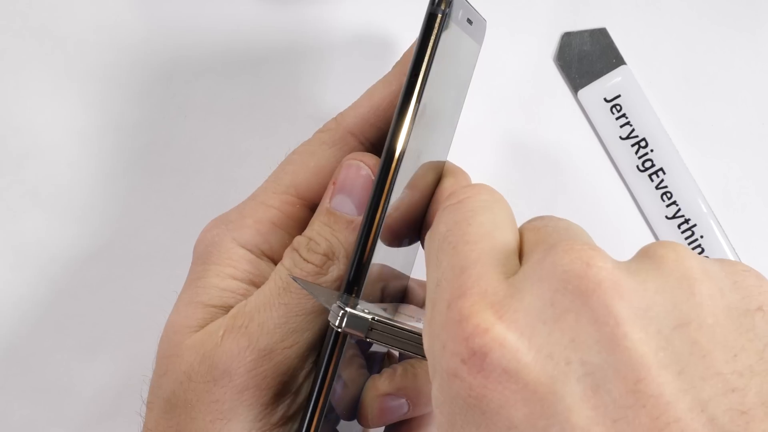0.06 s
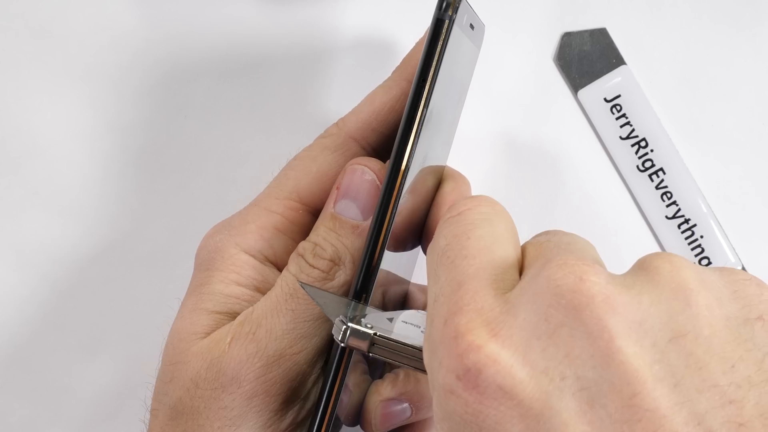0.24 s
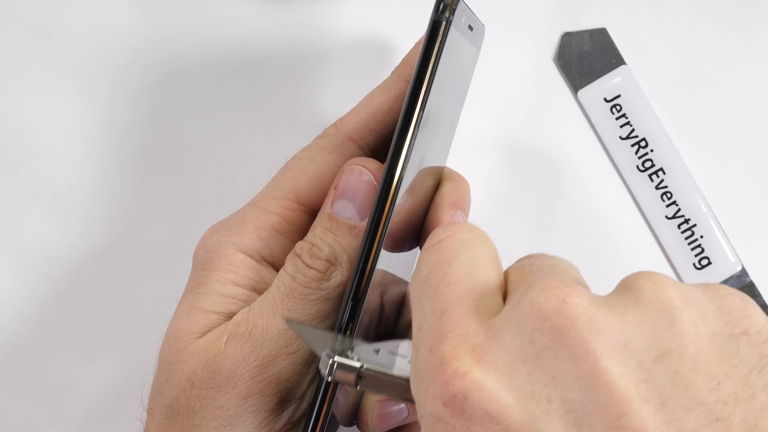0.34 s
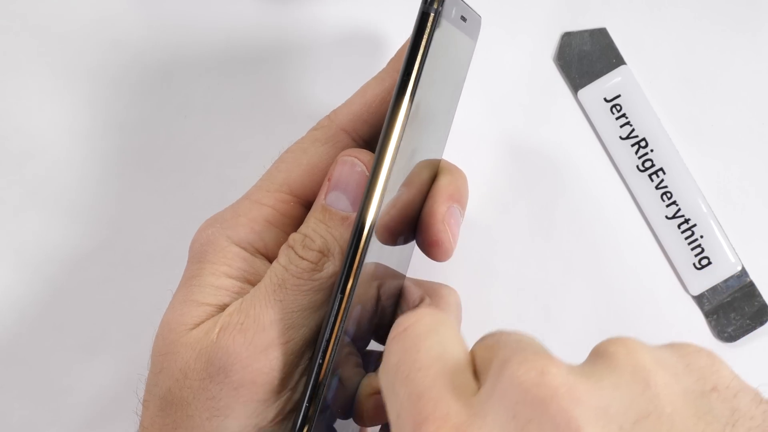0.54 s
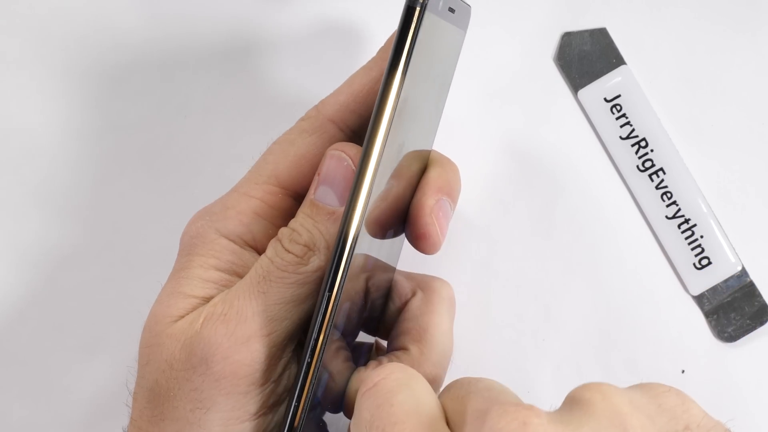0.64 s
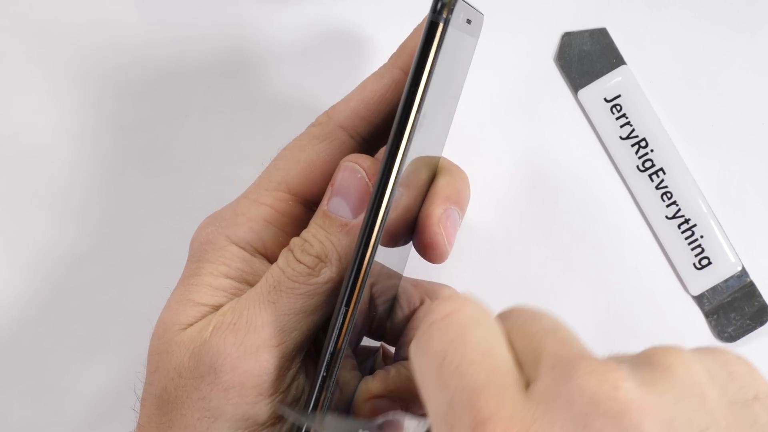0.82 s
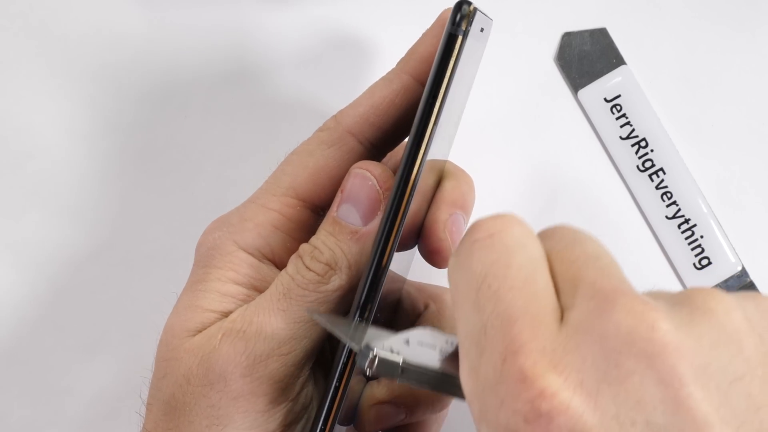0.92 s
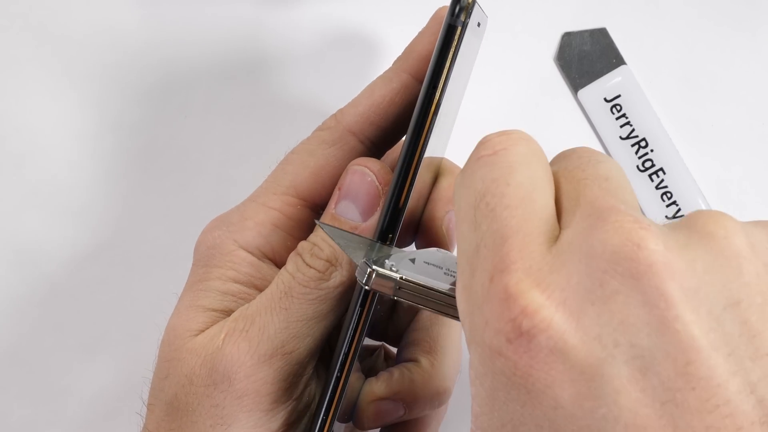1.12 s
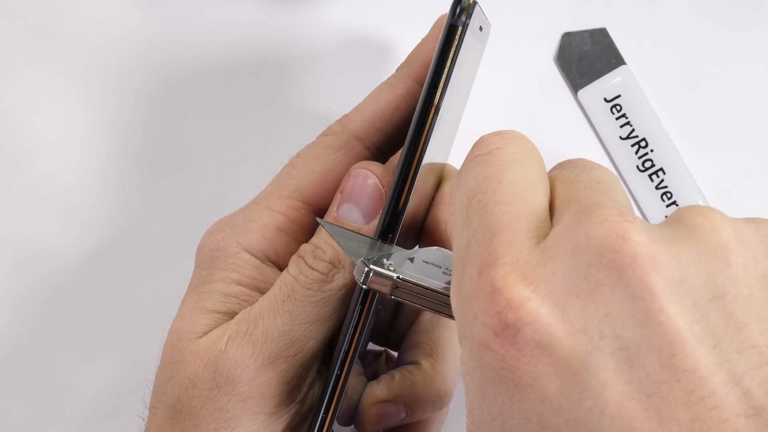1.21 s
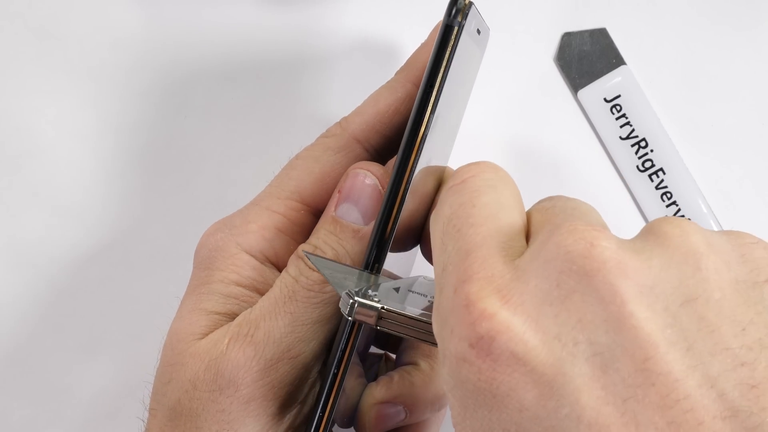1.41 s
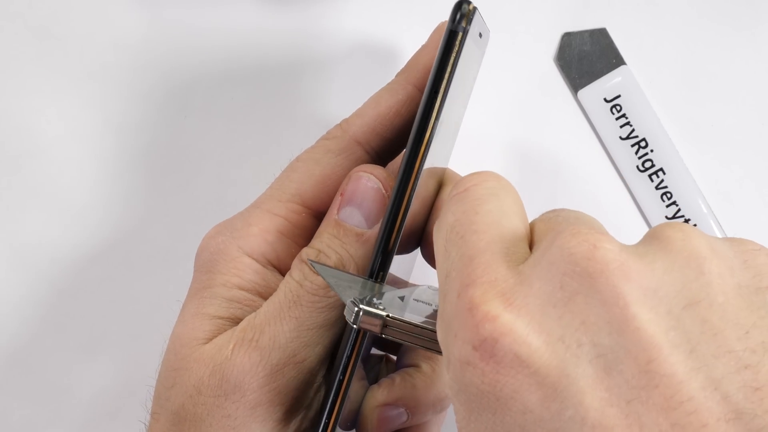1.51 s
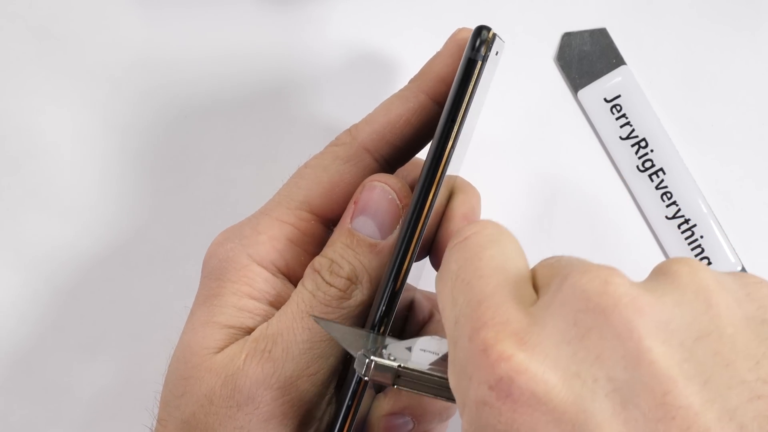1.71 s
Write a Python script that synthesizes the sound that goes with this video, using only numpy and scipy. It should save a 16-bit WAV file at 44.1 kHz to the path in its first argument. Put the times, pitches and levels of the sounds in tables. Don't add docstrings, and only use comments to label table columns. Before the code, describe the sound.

A razor blade taps a phone's metal frame, scrapes in stuttering gritty bursts that harden into a brief squeal, then taps again and scrapes more lightly; close microphone in a quiet room.

```python
import sys
import numpy as np
from scipy import signal
from scipy.fft import rfft, irfft
from scipy.io import wavfile
from scipy.ndimage import uniform_filter1d

SR = 44100
rng = np.random.default_rng(int(sys.argv[2]) if len(sys.argv) > 2 else 0)


def generate_wav(signal):
    frames = np.transpose(np.atleast_2d(signal))
    scaled = np.clip(frames, -1, 1) * 32767
    pcm = np.round(scaled).astype(np.int16)
    wavfile.write(sys.argv[1], SR, pcm)


def level_to_linear(level):
    exponent = np.asarray(level, float) / 20
    return 10 ** exponent


N = 77175

# f/Hz, density/dB
AIR_SPECTRUM = [(12, -28), (20, 0.5), (81, -3), (624, -27), (780, -31), (1530, -30), (1710, -32),
                (3340, -31.5), (16000, -43.5)]
# f/Hz, level/dB
HUM_TONES = [(60, -57.5), (120, -62.5)]
GLIDE_STARTS_S = 0, .202, 1.0665, .672, .09
GLIDE_LENGTHS_S = .03, .115, .104, .065, .105
# level/dB, fall over the length/dB
GLIDE_LEVELS = [(-47, -22), (-38.5, -22.5), (-32.5, -7.5), (-27, -11.5), (-60.5, 4)]
# f/Hz, density/dB
GLIDE_SPECTRA = [
    [(240, -32), (400, -20.5), (1010, -37), (1930, -6.5), (3530, -19.5), (16000, -24)],
    [(1470, -43.5), (2500, -15.5), (3250, 3.5), (4500, -10.5), (6300, -5), (7500, -10), (9000, 2.5),
     (12400, -27.5), (16000, -34)],
    [(800, -26.5), (1900, -1), (2720, -19), (3150, 2.5), (3750, 1), (4200, -18), (5050, -8.5),
     (5950, -21.5), (16000, -28)],
    [(500, -43), (900, -4), (1250, -19.5), (1570, -3.5), (1750, -18.5), (2100, -0.5), (2570, -11),
     (3110, -2), (9090, -19), (16000, -32)],
    [(1500, -17.5), (3300, -4), (6000, -17.5), (16000, -17)],
]
# t/s, peak level/dB, f/Hz, t60/s
TICKS = [(.165, -46, 6110, .017), (.19, -45.5, 9160, 0.035), (.2413, -27.5, 10200, 0.0072),
         (0.5318, -8, 9800, 0.0029), (.5364, -8.5, 9000, .008), (.594, -23, 9000, 0.0066),
         (0.548, -14.5, 3200, 0.024), (0.612, -21.5, 3100, .012), (.819, -46.5, 7620, .01),
         (.80, -51.5, 9500, 0.018), (.832, -49, 9580, .01), (.844, -47.5, 9000, .008),
         (0.872, -43, 2914, .02), (0.881, -41.5, 2800, 0.033), (0.913, -38, 8000, 0.0063),
         (.9125, -46, 4500, 0.0088), (0.921, -50.5, 9000, 0.0098), (.945, -52, 6900, .01),
         (.984, -53, 2960, 0.022), (1.007, -35.5, 9000, .008), (1.0063, -46.5, 3020, .012),
         (1.032, -54, 3000, 0.032), (1.257, -54, 9320, 0.007), (1.273, -49.5, 8500, 0.011),
         (1.361, -52, 8500, .004), (1.3694, -14, 7400, 0.012), (1.373, -24.5, 6060, 0.045),
         (1.562, -35, 9000, 0.005), (1.6165, -42, 8680, 0.014), (1.6153, -44, 2500, 0.011),
         (1.648, -46.5, 3120, 0.029), (1.722, -51.5, 3240, .02)]
# f/Hz, level/dB, t60/s
TAP_1_MODES = [(305, -20.5, 0.02), (750, -23, 0.0045), (1410, -17.5, 0.0041), (2120, -10, 0.0089),
               (2644, -25, 0.023), (3310, -21, 0.039), (3970, -31.5, .01), (4560, -21.5, 0.004),
               (5110, -24, 0.0066), (6230, -9.5, 0.0045), (7376, -9, 0.011), (8950, 8.5, 0.006),
               (10660, -6.5, 0.0068)]
# f/Hz, level/dB, t60/s
TAP_2_MODES = [(1262, -20, 0.025), (1990, -7.5, 0.0085), (3295, -13, 0.028), (4380, -16, .02),
               (8500, -23.5, 0.019), (9920, -17, 0.0086), (13200, -21, .008)]
# t/s, length/s, level/dB, peak place/0-1
LIGHT_SLIPS = [
    (.339, 0.023, -22, 0.23),
    (.366, 0.016, -21, 0.6),
    (.3925, 0.021, -20.5, 0.2),
    (.409, 0.0049, -21, 0.1),
    (.4185, 0.037, -20.5, 0.6),
    (.446, 0.02, -20.5, 0.85),
    (.509, 0.018, -23, 0.1),
]
# t/s, length/s, level/dB, peak place/0-1
HARD_SLIPS = [
    (.485, .016, -10, 0.49),
    (.539, 0.018, -9, 0.33),
    (.566, 0.023, -9, 0.4),
    (.6055, .015, -4.5, 0.13),
    (.6205, 0.0092, -8, 0.59),
    (.631, 0.012, -12, 0.48),
    (.642, 0.014, -16.5, 0.46),
    (.654, .026, -15.5, .5),
    (.678, 0.03, -25.5, .1),
]
# t/s, length/s, level/dB, peak place/0-1
SECOND_SLIPS = [
    (1.369, 0.018, -29.5, .3),
    (1.395, 0.0085, -40.5, .4),
    (1.4135, 0.015, -31.5, .6),
    (1.435, .008, -37.5, .8),
    (1.442, 0.032, -22.5, .3),
    (1.468, .027, -24.5, .5),
    (1.5045, 0.013, -25, .25),
    (1.533, 0.012, -33.5, .4),
    (1.545, .02, -49, .3),
]
# f/Hz, density/dB
LIGHT_GRIT = [(90, -53.5), (150, -2), (1400, -10.5), (4320, -8.5), (7620, -9.5), (10500, -7), (12400, -15),
              (14000, -17), (16000, 3.5)]
HARD_GRIT = [(88, -55.5), (150, -8), (1390, -44), (1940, -24), (4760, -14), (6910, -16.5), (7770, -2.5),
             (12400, 4.5), (16000, -23.5)]
SECOND_GRIT = [(88, -26), (150, -9.5), (1450, -10.5), (2020, -7), (5360, -20.5), (7620, -2), (11900, -19),
               (14200, -5), (16000, -4.5)]
# f/Hz, width/Hz, level/dB
LIGHT_RING = [(1890, 150, -10.5), (8000, 680, -8), (8940, 720, -5.5), (14200, 900, -9)]
HARD_RING = [(1980, 250, -10.5), (3176, 170, -11), (4600, 56, -11.5), (6370, 500, -13.5), (9730, 87, -13),
             (12760, 350, -7.5)]
SECOND_RING = [(1609, 30, -16.5), (1960, 160, -17), (7640, 300, -8), (8500, 400, -19), (13970, 690, -7.5)]
# t/s, peak level/dB
LIGHT_SNAPS = [(0.3456, -6), (0.3477, 9), (0.3501, 3), (0.3548, -17.5), (0.3673, -13.5), (0.369, -14),
               (0.3727, -7), (0.3778, -1.5), (0.3933, -16.5), (0.397, -9.5), (0.4016, -4.5),
               (0.4068, -18.5), (0.4111, -14.5), (0.4198, -16.5), (0.4232, -4.5), (0.4258, -5),
               (0.43, -4.5), (0.4388, -5), (0.4433, -13), (0.4468, -13), (0.4556, -17.5), (0.4589, -9.5),
               (0.4605, -6.5), (0.4631, -11)]
SECOND_SNAPS = [(1.3799, -16.5), (1.3983, -22), (1.4147, -21.5), (1.4192, -14), (1.4239, -15.5),
                (1.4405, -23.5), (1.4442, -11), (1.4481, -11), (1.4533, -14.5), (1.458, -17.5), (1.46, -13),
                (1.4656, -14), (1.4705, -12.5), (1.4721, -15), (1.4784, -11.5), (1.481, -20),
                (1.4863, -19.5), (1.4924, -10.5), (1.5054, -17.5), (1.5071, -18), (1.5088, -19),
                (1.5108, -15), (1.5346, -22.5), (1.5393, -24)]
# t/s, low mode f/Hz, high mode f/Hz, high minus low/dB, level/dB
SQUEAL_TRACK = [
    (0.484, 5820, 6954, 7.5, -1.5),
    (0.546, 5772, 6860, 6, -5),
    (.56, 5408, 6900, -4, -3.5),
    (.585, 5446, 6810, -1, -7.5),
    (0.611, 5700, 7000, 6, -4.5),
    (0.629, 5424, 6370, -7.5, -2.5),
    (0.649, 5408, 6390, -11.5, 3),
    (.664, 4870, 6160, -2, -3),
    (.678, 4530, 5990, -1, -4),
]
# t/s, f/Hz, level/dB
FRAME_TRACK = [
    (0.553, 1850, -26.5),
    (0.58, 1933, -30.5),
    (.597, 1960, -35.5),
    (0.622, 1993, -21),
    (0.644, 2033, -25.5),
    (.67, 2135, -41.5),
    (0.697, 2132, -32),
    (0.732, 2030, -37.5),
    (.745, 1960, -61),
]
# t/s, peak level/dB, f/Hz, length/s
THUDS = [(0.345, -32, 67, 0.054), (0.479, -26.5, 73, 0.026), (0.492, -35.5, 220, 0.049),
         (0.537, -27, 84, 0.029), (.543, -29, 305, 0.031), (.605, -35, 73.3, 0.031),
         (.606, -31, 259.2, 0.012), (1.374, -33.5, 64.8, 0.19), (1.443, -33.5, 69.1, 0.041),
         (1.488, -36, 68.3, 0.13), (1.502, -39.5, 217.2, 0.062)]
# f/Hz, t60/s
ROOM_T60 = [(500, .45), (2000, .33), (5000, .28), (9000, .17), (15000, .07)]

CHIP_FROM_HZ = 4500


def evened(x):
    return x / np.sqrt(np.mean(x ** 2) + 1e-20)


def read(points, hz):
    f, value = np.transpose(points)
    return np.interp(np.log(hz + 1), np.log(f + 1), value)


def add(mix, s, sound):
    part = mix[round(s * SR):][:len(sound)]
    part += sound[:len(part)]


def colour(x, spectrum):
    level_db = read(spectrum, abs(np.fft.fftfreq(4096, 1 / SR)))
    log_gain = np.log(level_to_linear(np.maximum(level_db, -100)))
    taps = np.fft.ifft(np.exp(np.conj(signal.hilbert(log_gain)))).real[:2048]
    return signal.oaconvolve(x, taps / np.linalg.norm(taps))[:len(x)]


def resonate(x, hz, width_hz):
    turn = np.exp(2j * np.pi * np.cumsum(hz * np.ones(len(x))) / SR)
    r = np.exp(-np.pi * width_hz / SR)
    ringing = turn * signal.lfilter([1], [1, -r], x / turn + 1e-18)
    return np.sqrt(2 * (1 - r * r)) * ringing.real


def air():
    level_db = -51
    t = np.arange(N) / SR
    hum = sum(level_to_linear(db) * np.sqrt(2) * np.sin(2 * np.pi * hz * t) for hz, db in HUM_TONES)
    spectrum = rfft(rng.standard_normal(N)) * level_to_linear(read(AIR_SPECTRUM, np.fft.rfftfreq(N, 1 / SR)))
    return level_to_linear(level_db) * evened(irfft(spectrum, N)) + hum


def glides():
    release_s = 0.0067
    out = np.zeros(N)
    t = np.arange(12000) / SR
    rows = zip(GLIDE_STARTS_S, GLIDE_LENGTHS_S, GLIDE_LEVELS, GLIDE_SPECTRA)
    for start, length, (db, fall_db), spectrum in rows:
        lift_db = 10 * np.maximum(t - length, 0) / release_s
        shape = level_to_linear(db + fall_db * t / length - lift_db)
        add(out, start, shape * colour(rng.standard_normal(len(t)), spectrum))
    return out


def ticks():
    relative_width, ring, fizz = .16, .7, .13
    out = np.zeros(N)
    t = np.arange(2000) / SR
    for s, db, hz, t60 in TICKS:
        noise = rng.standard_normal(len(t))
        burst = ring * resonate(noise, hz, hz * relative_width) + fizz * np.diff(noise, prepend=0)
        add(out, s, level_to_linear(db - 60 * t / t60) * burst)
    return out


TAP_1_S, TAP_2_S = .1995, 1.0638


def taps():
    rise_s, crack_t60_s, longest_t60_s = .0007, .02, .022
    crack_band = signal.butter(2, (930, 9000), "band", fs=SR, output="sos")
    out = np.zeros(N)
    t = np.arange(SR // 3) / SR
    for s, modes, crack_db in (TAP_1_S, TAP_1_MODES, -11), (TAP_2_S, TAP_2_MODES, -17):
        crack = signal.sosfilt(crack_band, rng.standard_normal(len(t)))
        sound = level_to_linear(crack_db - 60 * t / crack_t60_s) * crack
        for hz, db, t60 in modes:
            sound += level_to_linear(db - 60 * t / min(t60, longest_t60_s)) * np.sin(2 * np.pi * hz * t)
        add(out, s, np.minimum(t / rise_s, 1) * sound)
    return out


def beat():
    level_db, t60_s, rise_s = -26, .22, .003
    t = np.maximum(np.arange(N) / SR - TAP_1_S, 0)
    pair = sum(np.sin(2 * np.pi * hz * t) for hz in (1776.5, 1786.5))
    return np.minimum(t / rise_s, 1) * level_to_linear(level_db - 60 * t / t60_s) * pair


def pressure(slips):
    edge_s, edge_db = .0007, -9
    out = np.zeros(N)
    for start, length, db, peak in slips:
        u = np.arange(0, 1, 1 / (length * SR))
        peak = np.clip(peak, .02, .98)
        edge = np.minimum(np.minimum(u, 1 - u) * length / edge_s, 1)
        swell = np.minimum(u / peak, (1 - u) / (1 - peak))
        add(out, start, edge * level_to_linear(db + edge_db * (1 - swell)))
    return out


def chips():
    chips_per_s, spread_db, clump_db, clump_s, click_share = 9000, 3, 3.5, .0007, .3
    clumps = evened(uniform_filter1d(rng.standard_normal(N), round(clump_s * SR)))
    size_db = spread_db * np.minimum(rng.exponential(1, N), 3.5) + clump_db * np.minimum(clumps, 1.8)
    struck = rng.random(N) < chips_per_s / SR
    clicks = evened(level_to_linear(size_db) * rng.choice([-1., 1.], N) * struck)
    rub = evened(click_share * clicks + rng.standard_normal(N))
    low_pass = signal.butter(1, CHIP_FROM_HZ, fs=SR, output="sos")
    return clicks + signal.sosfilt(low_pass, rub - clicks), rub


def snaps(rows, db):
    out = np.zeros(N)
    s, peak_db = np.transpose(rows)
    out[np.round(s * SR).astype(int)] = level_to_linear(peak_db + db) * rng.choice([-1., 1.], len(s))
    return signal.sosfilt(signal.butter(1, CHIP_FROM_HZ, "high", fs=SR, output="sos"), out)


def stroke(drive, grit, ring):
    ringing = sum(level_to_linear(db) * resonate(drive, hz, width) for hz, width, db in ring)
    return colour(drive, grit) + ringing


def thuds(push):
    rumble_hz, rumble_db, smooth_s = 87.5, -35, 0.034
    low = signal.sosfilt(signal.butter(2, rumble_hz, fs=SR, output="sos"), rng.standard_normal(N))
    shake = np.sqrt(abs(uniform_filter1d(push, round(smooth_s * SR))))
    out = level_to_linear(rumble_db) * evened(low) * shake
    for s, db, hz, length in THUDS:
        t = np.arange(0, length, 1 / SR)
        shape = np.sin(np.pi * (t / length) ** 0.19)
        add(out, s, level_to_linear(db) * shape * np.sin(2 * np.pi * hz * t))
    return out


def squeal(push, rub):
    level_db, width_hz, wobble = -0.5, 320, .03
    lock = 0.52
    s, *curves = np.transpose(SQUEAL_TRACK)
    low_hz, high_hz, tilt_db, db = (np.interp(np.arange(N) / SR, s, c) for c in curves)
    waver = 1 + wobble * evened(uniform_filter1d(rng.standard_normal(N), 150))

    def sing(hz):
        in_step = np.cos(2 * np.pi * np.cumsum(hz) / SR)
        return resonate(push * (rub + lock * in_step), hz, width_hz)

    low = level_to_linear(-tilt_db / 2) * sing(low_hz * waver)
    high = level_to_linear(tilt_db / 2) * sing(high_hz * waver[::-1])
    return level_to_linear(db + level_db) * (low + high)


def frame(rub):
    level_db, width_hz, lock = -17, 210, 0.087
    s, hz, db = np.transpose(FRAME_TRACK)
    t = np.arange(N) / SR
    hz = np.interp(t, s, hz)
    in_step = np.cos(2 * np.pi * np.cumsum(hz) / SR)
    drive = level_to_linear(np.interp(t, s, db, -120, -120) + level_db) * (rub + lock * in_step)
    return resonate(resonate(drive, hz, width_hz), hz, width_hz)


def room(x):
    tail = np.zeros(SR)
    at = np.arange(200, SR - 20, 20)
    tail[at + rng.integers(0, 20, at.shape)] = rng.choice([-1., 1.], at.shape)
    hz, t, z = signal.stft(tail, SR, nperseg=256)
    decay = level_to_linear(-60 * t / read(ROOM_T60, hz)[:, None])
    tail = signal.istft(z * decay, SR, nperseg=256)[1]
    return signal.fftconvolve(x, tail / np.linalg.norm(tail))[:N]


def scene():
    hard_db, room_db = -9.5, -17
    grain, rub = chips()
    light, hard, second = pressure(LIGHT_SLIPS), pressure(HARD_SLIPS), pressure(SECOND_SLIPS)
    blade = glides() + ticks() + taps()
    blade += stroke(light * grain + snaps(LIGHT_SNAPS, 7.5), LIGHT_GRIT, LIGHT_RING)
    blade += level_to_linear(hard_db) * (stroke(hard * grain, HARD_GRIT, HARD_RING) + squeal(hard, rub))
    blade += frame(rub)
    blade += stroke(second * grain + snaps(SECOND_SNAPS, 6), SECOND_GRIT, SECOND_RING)
    mix = blade + level_to_linear(room_db) * room(blade) + beat() + thuds(light + hard + second) + air()
    return mix[None]


def band_limit(x):
    return signal.sosfilt(signal.butter(12, 16230, fs=SR, output="sos"), x)


def record(dry):
    edge_hz = 16200
    low_pass = signal.firwin(255, edge_hz, fs=SR)
    mix = signal.oaconvolve(np.clip(dry, -1, 1), low_pass[None], "same")
    return band_limit(mix)


dry = scene()
out = record(dry)
generate_wav(out)
```